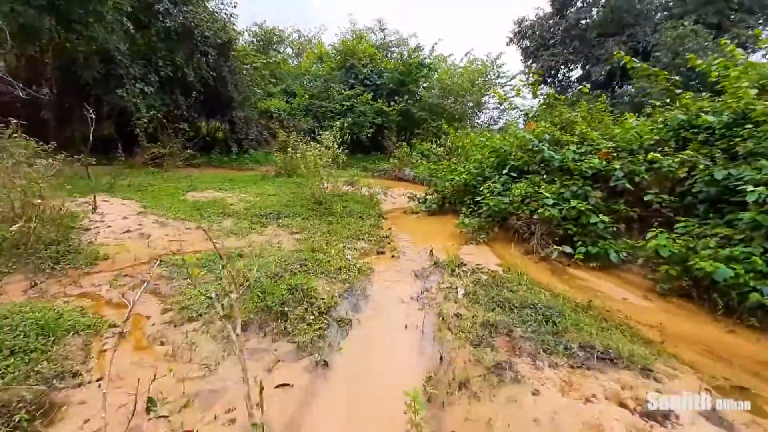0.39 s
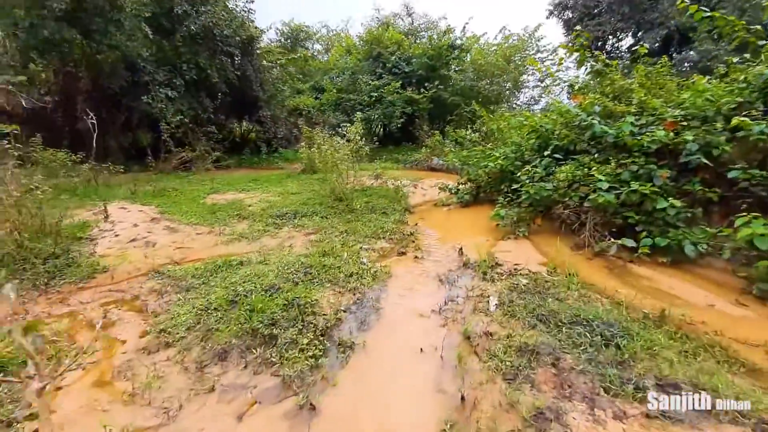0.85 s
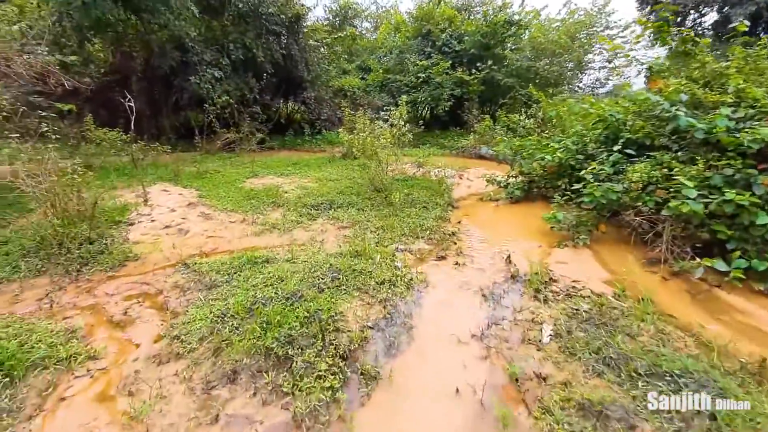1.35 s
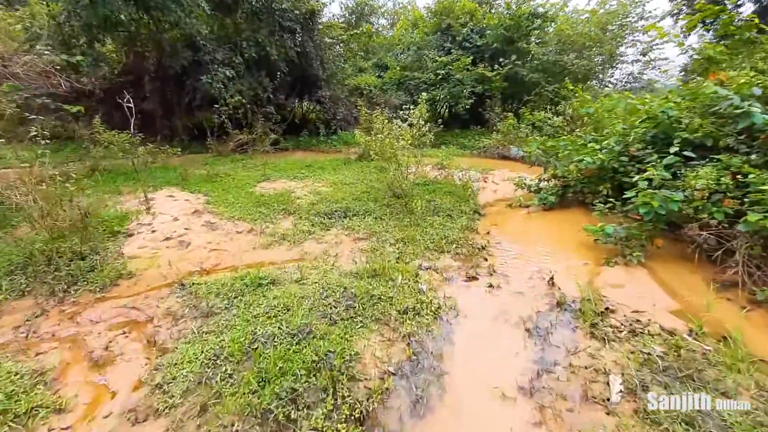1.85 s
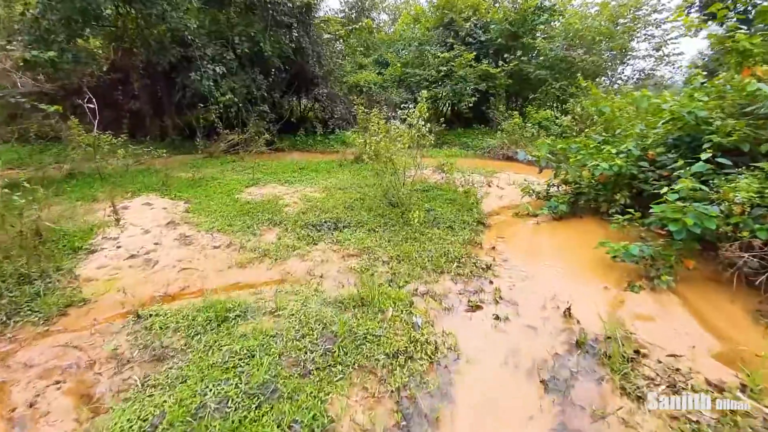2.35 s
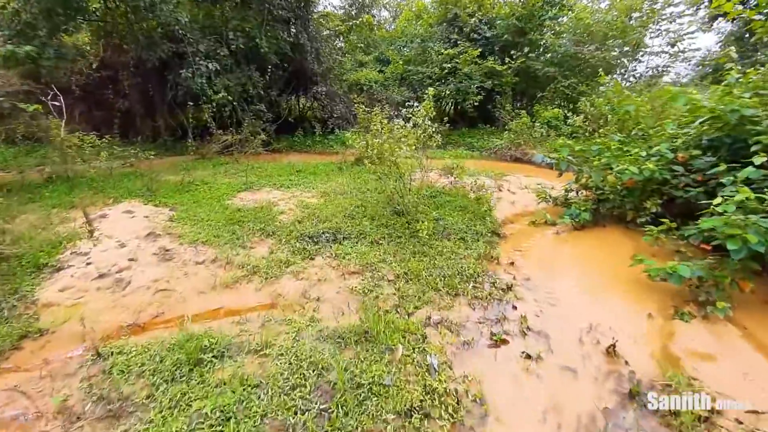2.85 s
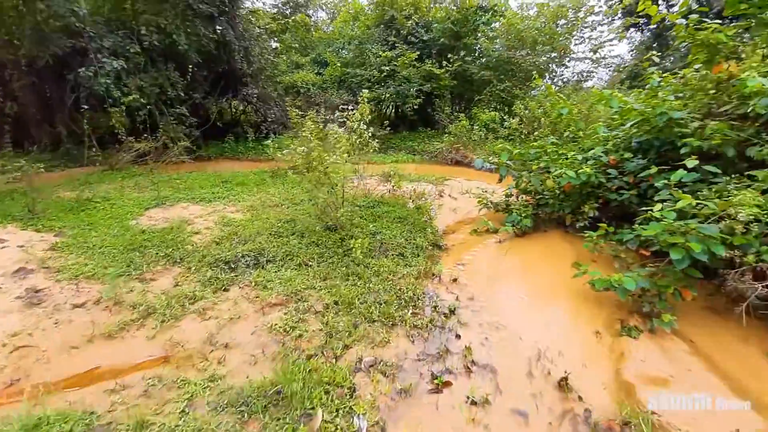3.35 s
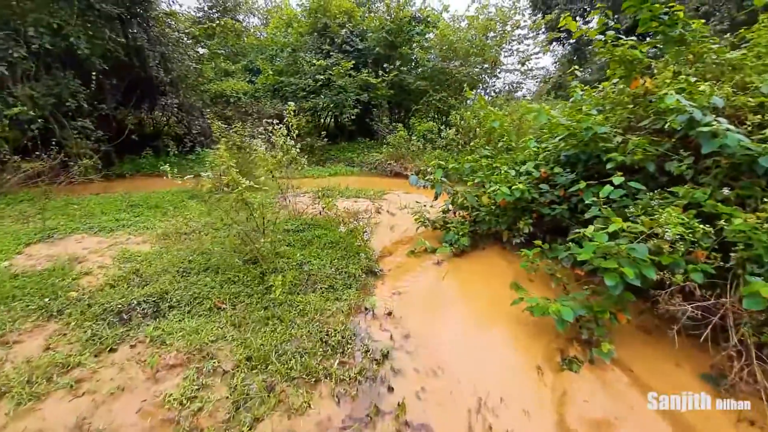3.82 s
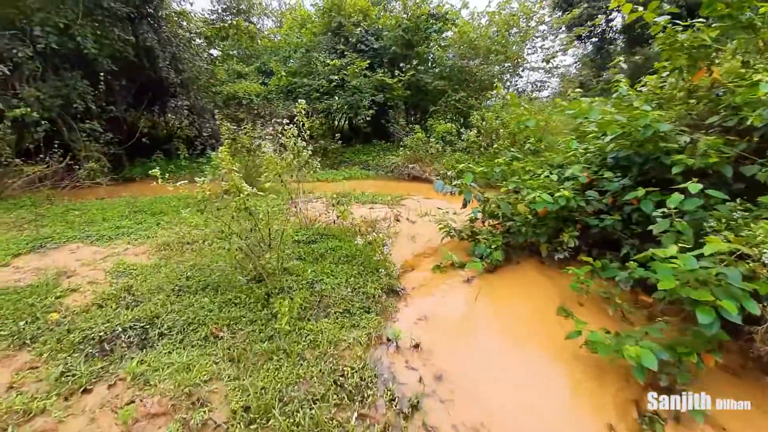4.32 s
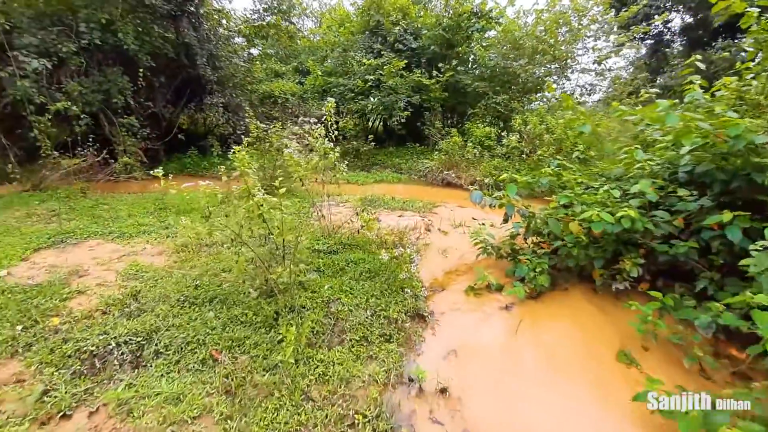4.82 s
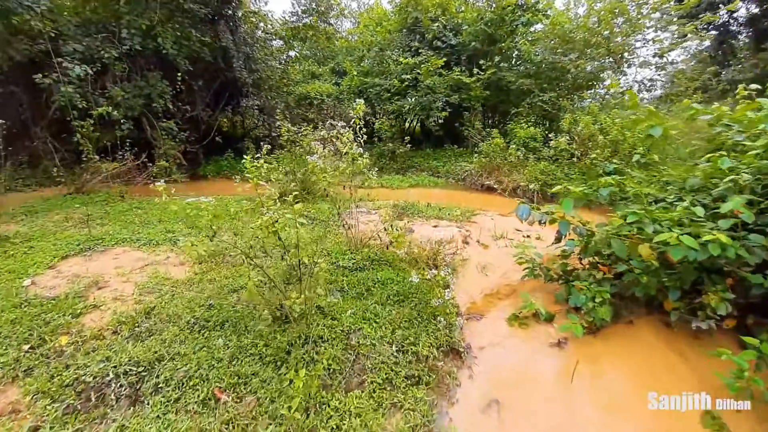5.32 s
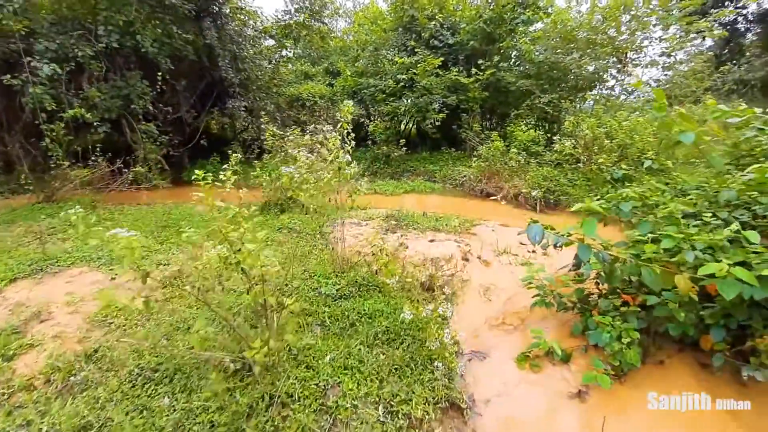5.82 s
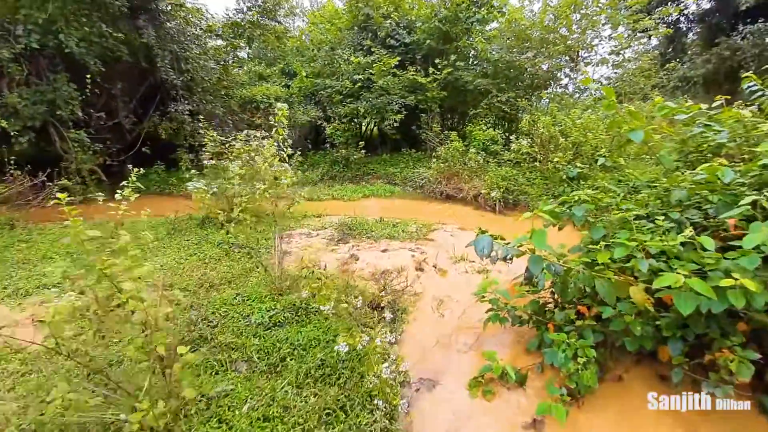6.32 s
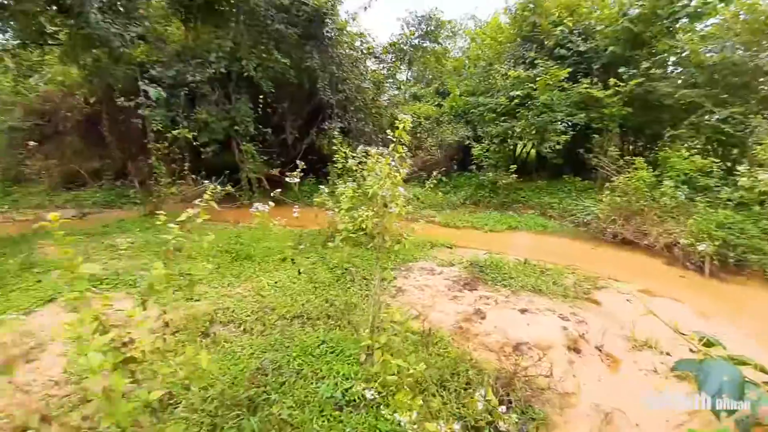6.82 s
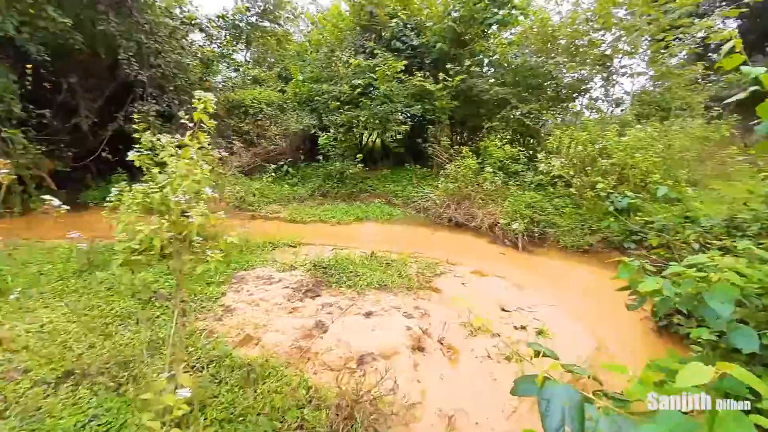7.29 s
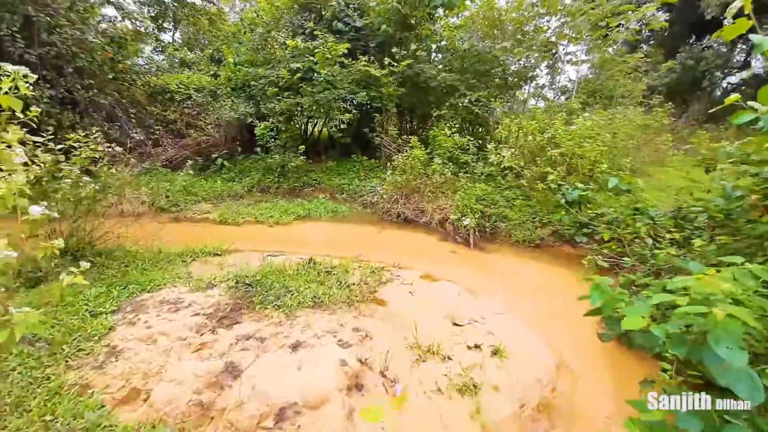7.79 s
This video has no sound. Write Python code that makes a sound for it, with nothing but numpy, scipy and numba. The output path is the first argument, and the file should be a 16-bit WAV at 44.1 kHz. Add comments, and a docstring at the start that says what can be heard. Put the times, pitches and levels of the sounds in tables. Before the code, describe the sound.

Someone wades through shallow muddy water outdoors, each stride sloshing, gurgling and plopping with bright fine spray, over faint low wind buffeting.

```python
"""Someone wades through shallow muddy water, carrying a two-port microphone: each stride sloshes, built from
patchy noise blended with swarms of ringing bubbles as gurgle, splash and fine spray. Larger trapped bubbles
plop as damped sines, many rising in pitch; droplets snap as clusters of short pings. Light wind buffets
the ports as low noise, different on each. The water drifts from side to side; the sound cuts out once, briefly."""
import sys
import numpy as np
from scipy import signal
from scipy.fft import rfft, irfft, next_fast_len
from scipy.io import wavfile
from scipy.ndimage import uniform_filter1d, map_coordinates
from numba import njit

SR = 44100
rng = np.random.default_rng(int(sys.argv[2]) if len(sys.argv) > 2 else 0)


def bounce(signal):
    """Save signal as a 16-bit WAV file at the path given by the first command-line argument."""
    frames = np.transpose(np.atleast_2d(signal))
    limited = np.clip(frames, -1, 1)
    pcm = np.round(limited * 32767).astype(np.int16)
    wavfile.write(sys.argv[1], SR, pcm)


def makeup_ratio(level_db):
    """Linear amplitude ratio for a level in decibels (20 dB per factor of ten)."""
    decades = np.asarray(level_db, float) / 20
    return 10 ** decades


N = 349272  # samples
LAG_S = .0001  # spread of arrival-time differences between the ports


def unit(x):
    """Scaled to rms 1."""
    return x / np.sqrt(np.mean(x ** 2) + 1e-20)


def along(points, hz):
    """(f/Hz, value) points read on a log frequency axis."""
    f, value = np.transpose(points)
    return np.interp(np.log(hz + 1), np.log(f + 1), value)


def wobble(rate):
    """A smooth random curve, rate knots a second."""
    return map_coordinates(rng.standard_normal(int(N * rate / SR) + 4), [np.arange(N) * rate / SR])


def filtered(x, response):
    """x shaped by a response of frequency."""
    m = next_fast_len(N + 8192)
    return irfft(rfft(x, m) * response(np.fft.rfftfreq(m, 1 / SR)), m)[..., :N]


def swells(crest_s, rise_ms, fall_ms):
    """Power of each swell (one row each, a point per ms) and the time since its crest in s."""
    since = np.arange(0, N / SR, .001) - np.reshape(crest_s, (-1, 1))
    pace_ms = np.where(since < 0, np.reshape(rise_ms, (-1, 1)), np.reshape(fall_ms, (-1, 1)))
    decades = 1000 * np.abs(since) / np.maximum(pace_ms, 5)  # no pace is quicker than 5 ms per 10 dB
    return 10 ** -np.minimum(decades, 12), since


def per_sample(slow):
    """A curve with a point per ms, stretched to one value per sample."""
    return np.interp(np.arange(N) / SR, np.arange(len(slow)) / 1000, slow)


def summed(shape, crest_db, calm_db):
    """Gain of all swells together over a calm level, added by power."""
    return per_sample(np.sqrt(makeup_ratio(crest_db) ** 2 @ shape + makeup_ratio(calm_db) ** 2))


def rush(spectrum, lag_s, patchy_db):
    """Patchy stereo noise; sources all around make the ports differ once the lag nears a period."""
    z = signal.stft(rng.standard_normal((2, N)), nperseg=256)[2]
    field = uniform_filter1d(rng.standard_normal(z.shape[1:]), 5, axis=0)
    field = uniform_filter1d(field, 5, axis=1)
    pair = signal.istft(z * makeup_ratio(patchy_db * unit(field)), nperseg=256)[1][:, :N]

    def mid_side(hz):
        alike = np.exp(-(2 * np.pi * hz * lag_s) ** 2 / 2)  # correlation between the ports
        turn = np.arccos(alike) / 2
        return makeup_ratio(along(spectrum, hz)) * [np.cos(turn), np.sin(turn)]

    mid, side = filtered(pair, mid_side)
    return unit(np.array([mid + side, mid - side]))


@njit
def ring(start, size, hz, t60, rise, lag, soft, count):
    """Damped sines whose pitch glides as the bubble nears the surface, one arrival time per port."""
    out = np.zeros((2, count))
    for k in range(len(start)):
        for port in range(2):
            s0 = start[k] + (port - .5) * lag[k]
            first = int(np.ceil(s0 * SR))
            for i in range(max(first, 0), min(first + int(t60[k] * SR * .75) + 1, count)):
                t = i / SR - s0
                swell = (1 - np.exp(-t * hz[k] / soft)) * np.exp(-np.log(1000) * t / t60[k])
                out[port, i] += size[k] * swell * np.sin(2 * np.pi * hz[k] * t * (1 + rise[k] * t / t60[k]))
    return out


def swarm(per_s, centre_hz, octaves, cycles, scatter_db, rise, soft):
    """Countless small bubbles: random times, pitches and sizes, rms 1."""
    count = int(np.ceil(per_s * N / SR))
    when, luck = rng.random((count, 2)), rng.standard_normal((count, 4))
    centre = np.broadcast_to(centre_hz, N)[(when[:, 0] * N).astype(int)]
    hz = np.clip(centre * 2 ** (octaves * luck[:, 0]), 100, SR / 2.6)
    size = makeup_ratio(np.minimum(-scatter_db * np.log(when[:, 1] + 1e-9), 4 * scatter_db))  # few large, many small
    t60 = cycles / hz * 2 ** (luck[:, 1] / 2)
    glide = rise * (1 + luck[:, 3])
    return unit(ring(when[:, 0] * N / SR, size, hz, t60, glide, LAG_S * luck[:, 2], soft, N))


def blend(noise, grains, share):
    """Two textures mixed by power, share being the part of the second."""
    return np.sqrt(1 - share) * noise + np.sqrt(share) * grains


# colour of the wind: f/Hz, relative level/dB
WIND_COLOUR = [(20, -43), (32, -20), (45, 6.5), (62, 4.5), (110, 4), (160, -3.5), (230, -37)]
# puffs of wind, before each port's own gain: crest t/s, level/dB, rise and fall [ms per 10 dB]
WIND_PUFFS = [(.48, -46.5, 63), (.8, -56, 90), (.92, -60, 62), (1.19, -55, 30), (3.41, -61, 35),
              (3.75, -59.5, 110), (4.24, -58.5, 68), (4.57, -61, 44), (5.05, -64, 90), (5.84, -53, 40),
              (6.36, -58.5, 136), (7.05, -63, 120), (7.7, -78, 150)]


def wind():
    """Low lumps of air on the ports, different on each."""
    s, db, pace_ms = np.transpose(WIND_PUFFS)
    puffs = summed(swells(s, pace_ms, pace_ms)[0], db, calm_db=-73.5)
    lumps = makeup_ratio(1.7 * np.array([wobble(9.3), wobble(6.3)]))
    port_gain = makeup_ratio(np.array([[5.5], [.4]]))  # left, right
    return port_gain * puffs * unit(lumps * rush(WIND_COLOUR, 1, patchy_db=4.0))


# droplet snaps, before the pings scatter: t/s, level/dB, f/Hz
DROPLET_SNAPS = [(0.6566, -17.5, 14500), (0.7615, -29.5, 7950), (.9354, -27, 11300), (2.9138, -18, 13400),
                 (2.944, -22.5, 12300), (3.305, -18.5, 4320), (3.3984, -24, 7400), (3.5795, -17, 4700),
                 (4.3084, -21, 5500), (5.0397, -30, 5960), (5.1877, -26.5, 7750), (5.2127, -28.5, 6600),
                 (5.4037, -24.5, 6540), (5.7762, -31.5, 5100), (6.3137, -25, 12500), (6.3466, -17, 12900),
                 (6.3791, -22, 11000), (6.4435, -25, 5400), (6.4704, -29, 12300), (7.7094, -21, 5400)]


def snaps():
    """A droplet strikes the surface and breaks up: six ragged pings scattered around one pitch."""
    s, db, hz = np.repeat(np.transpose(DROPLET_SNAPS), 6, axis=1)
    luck = rng.standard_normal((len(s), 2))
    lag = LAG_S * np.repeat(rng.standard_normal(len(DROPLET_SNAPS)), 6)
    late = luck[:, 0] ** 2  # later pings are weaker
    when = s + 0.0014 + 0.00063 * late
    pitch_hz = np.clip(hz * 2 ** (0.41 * luck[:, 1]), 100, SR / 2.8)
    return ring(when, makeup_ratio(db - late), pitch_hz, 0.0019 + 7 / hz, 0 * s, lag, 0.21, N)


# air pockets closed in by the foot: start t/s, level/dB, starting f/Hz, t60 [s],
# mean pitch rise over t60 [share of the starting pitch]
AIR_BUBBLES = [(.2466, -15, 1180, 0.013, 0.011), (.3494, -9, 260, 0.076, 0.024),
               (.3508, -16.5, 1210, 0.022, 0.12), (.3763, -20, 432, 0.097, 2), (.42, -23, 590, 0.062, 0.54),
               (.4845, -16.5, 903, .06, 0.19), (0.5114, -16, 870, .013, .5), (.5252, -20.5, 2030, 0.024, 0),
               (.599, -22.5, 2010, 0.019, 0.057), (.88, -27.8, 1060, 0.085, 0.63),
               (.9443, -24.5, 1930, 0.018, 0.14), (.985, -29, 1620, .034, .13), (1, -30.5, 1210, 0.048, .1),
               (1.027, -34, 306, 0.14, 0.18), (1.1797, -32, 1490, 0.04, 0), (1.396, -23.5, 1920, 0.017, 0),
               (1.6475, -23.5, 1410, 0.015, 0), (1.844, -45.5, 346, 0.12, .5),
               (1.879, -33.5, 1040, 0.063, 0.72), (2.0865, -26, 887, 0.068, 0.36),
               (2.1493, -23.5, 925, 0.087, 0.24), (2.2308, -17, 1060, 0.014, 0.072),
               (2.2932, -24, 910, 0.054, 0.29), (2.3094, -22.5, 2160, 0.014, 0.04),
               (2.6825, -29.5, 1170, .039, 0.18), (2.8594, -21, 1340, 0.015, 0.046),
               (3.0614, -25, 1290, 0.018, 0), (3.2118, -19.5, 1970, 0.0084, 0),
               (3.51, -30, 480, 0.059, 0.31), (3.598, -24, 1190, 0.013, 0), (3.618, -25, 1240, 0.038, 0),
               (3.6352, -12, 990, 0.0093, 0.11), (3.6568, -15, 399, .043, 0), (3.7, -27.5, 204, 0.14, 1.4),
               (3.707, -14, 2460, 0.0041, 0.036), (3.8, -31, 235, 0.088, .5),
               (4.1265, -19.5, 980, 0.042, 0), (4.1747, -17.5, 836, 0.062, 0.18),
               (4.2386, -23, 610, 0.035, 2.4), (4.245, -29.5, 290, .12, 0.37),
               (4.2741, -22.5, 583, .036, 1.8), (4.4958, -19, 1050, 0.018, 0),
               (4.5403, -21.5, 2130, .008, 0.19), (4.9822, -21, 638, 0.087, 0.21),
               (4.9927, -8, 626, 0.016, 0), (4.9932, -10.5, 1206, 0.032, 0), (5.0666, -9.5, 517, 0.011, 0),
               (4.7207, -23.5, 3640, 0.012, 0.52), (4.889, -32, 400, 0.067, 0.0086),
               (5.151, -23.5, 447, 0.058, 0), (5.2545, -25.5, 795, 0.037, 0.042),
               (5.276, -25.5, 844, .039, .12), (5.5755, -32, 442, 0.087, 0), (5.736, -30, 870, .028, 1.3),
               (5.7805, -21.5, 692, 0.055, 0.44), (6.222, -24, 2090, 0.033, 0.14),
               (6.2703, -24, 3390, .008, 0), (6.318, -29.5, 484, 0.066, 1),
               (6.3333, -22.5, 1270, .025, 0.16), (6.3502, -25, 950, 0.042, 0),
               (6.3744, -22.5, 1307, 0.034, .2), (6.4412, -26, 1150, 0.018, 0),
               (6.4433, -15, 3830, 0.0083, 0.4), (6.5332, -32.5, 560, .05, 1.4),
               (6.7751, -29, 1500, 0.0092, 2.1), (6.7833, -12.5, 2070, 0.0034, 0.12),
               (6.7878, -20, 1900, 0.0039, 0.35), (6.859, -30.5, 1990, 0.011, 0.038),
               (6.896, -32, 1060, 0.053, 0.73), (7.084, -27, 1070, 0.047, 0.35),
               (7.1522, -24.5, 890, 0.033, 1), (7.153, -21, 1960, 0.0096, 0.088),
               (7.1634, -12, 1030, 0.0072, 0), (7.175, -24, 1000, 0.014, .2),
               (7.2382, -32.5, 622, 0.067, .5), (7.3767, -29, 710, .092, 0.42),
               (7.5417, -23, 715, 0.034, 2.4), (7.5522, -20.5, 870, 0.021, 0),
               (7.7246, -15, 580, 0.0082, 0), (7.7547, -24.5, 700, .029, 1.6), (7.8009, -28, 600, .05, 0.7),
               (7.854, -33, 645, 0.069, 0.57)]


def bubbles():
    """Pockets of air closed in by the foot: damped plops, many with a pitch that climbs."""
    s, db, hz, t60, rise = np.transpose(AIR_BUBBLES)
    lag = .6 * LAG_S * rng.standard_normal(len(s))
    return ring(s, makeup_ratio(db), hz, t60, rise, lag, 0.32, N)


# colour of the spray noise: f/Hz, relative level/dB
SPRAY_COLOUR = [(1060, -23), (1800, -3), (3050, -5.5), (6600, -7), (8590, -12), (12100, -6), (13800, -8),
                (15850, -10.5), (16400, -45)]


def spray_texture():
    """Fine hiss full of tiny bubbles, with single drops falling back."""
    tiny = swarm(1100, 7620, 0.89, cycles=9.7, scatter_db=3.0, rise=0.091, soft=0.26)
    drops = swarm(160, 3097, 0.541, cycles=24.7, scatter_db=3.0, rise=0.306, soft=0.18)
    hiss = blend(rush(SPRAY_COLOUR, LAG_S, patchy_db=1.5), tiny, 0.32)
    return blend(hiss, drops, 0.19)


# colour of the splash noise: f/Hz, relative level/dB
SPLASH_COLOUR = [(520, -47), (850, -1), (1150, -5), (2000, -7.5), (3500, -11), (6000, -29)]


def splash_texture():
    """Broken water: mid-pitched bubbles ringing over patchy noise."""
    ringing = swarm(260, 1329.6, .45, cycles=34.3, scatter_db=1.0, rise=0.403, soft=0.2)
    return blend(rush(SPLASH_COLOUR, LAG_S, patchy_db=4.0), ringing, 0.75)


# a foot sinks in and drags air under: crest t/s, rise [ms per 10 dB], fall [ms per 10 dB],
# gurgle level/dB before the surges, air pocket f/Hz before the ceiling below
FOOT_PLUNGES = [(0.246, 14, 169, -40.5, 569), (0.35, 16, 88, -34, 304), (0.773, 9, 147, -51.5, 495),
                (1.013, 43, 105, -40.5, 490), (1.648, 106, 108, -47, 520), (2.14, 30, 146, -47, 576),
                (2.315, 7, 97, -34, 556), (2.487, 91, 27, -43, 536), (3.039, 208, 25, -46, 540),
                (3.154, 107, 201, -42.5, 492), (3.526, 54, 4, -57, 527), (3.645, 20, 57, -36.5, 430),
                (3.788, 79, 297, -35.5, 282.5), (4.235, 12, 107, -35.5, 557), (4.704, 71, 49, -50.5, 543),
                (4.993, 59, 136, -30, 579), (5.263, 144, 30, -36.5, 600), (5.402, 37, 22, -44, 632),
                (5.576, 38, 86, -46.5, 461), (5.78, 71, 138, -37, 511), (6.3, 99, 36, -45.5, 310),
                (6.527, 4, 42, -44, 606), (7.023, 76, 121, -37, 356), (7.521, 119, 89, -41.5, 600),
                (7.715, 25, 189, -42.5, 505)]
CLIMB_OCT_PER_S, SMALLEST_POCKET_HZ = 2.85, 600  # pockets shrink after the crest, down to the smallest


def pockets():
    """Gurgle gain and pocket pitch: the loudest plunge leads, its pitch climbing after the crest."""
    s, rise_ms, fall_ms, db, hz = np.transpose(FOOT_PLUNGES)
    shape, since = swells(s, rise_ms, fall_ms)
    climbing = hz[:, None] * 2 ** (CLIMB_OCT_PER_S * np.clip(since, 0, 2))
    climbing = np.minimum(climbing, SMALLEST_POCKET_HZ)
    power = shape * makeup_ratio(db)[:, None] ** 2
    pocket_hz = per_sample((power * climbing).sum(axis=0) / power.sum(axis=0))
    return summed(shape, db, calm_db=-77.5), pocket_hz


# colour of the gurgle noise around large pockets: f/Hz, relative level/dB
GURGLE_COLOUR = [(130, -12), (200, -3.5), (280, -1), (400, -6), (650, -45)]


def gurgle_texture(pocket_hz):
    """Low churn and bubbles that follow the pocket pitch."""
    shallow = np.clip(np.log2(pocket_hz / 290), 0, 1)  # small pockets churn an octave above large ones
    large = rush(GURGLE_COLOUR, LAG_S, patchy_db=5.5)
    small = rush(np.multiply(GURGLE_COLOUR, [2, 1]), LAG_S, patchy_db=3.0)
    glugs = swarm(120, pocket_hz, 0.256, cycles=16.9, scatter_db=2.2, rise=0.342, soft=0.068)
    return blend(blend(large, small, shallow), glugs, 0.54)


# each push of a leg through the surface, levels before the surges: crest t/s, rise [ms per 10 dB],
# fall [ms per 10 dB], splash level/dB, spray level/dB
LEG_SLOSHES = [(0.189, 20, 164, -57, -41), (0.244, 15, 78, -35, -38.5), (0.423, 52, 130, -31.5, -37.5),
               (0.527, 82, 15, -30.5, -33.5), (0.771, 86, 50, -56, -41), (0.871, 77, 55, -45.5, -43.5),
               (0.982, 74, 232, -44.5, -47.5), (1.163, 32, 163, -42, -50), (1.397, 52, 31, -45, -38),
               (1.496, 42, 118, -50.5, -42.5), (1.653, 41, 152, -47.5, -46.5), (1.73, 70, 81, -63, -39.5),
               (1.953, 51.5, 134, -43.5, -39), (2.131, 45, 182, -38, -39), (2.305, 25, 314, -38.5, -36),
               (2.47, 123, 47, -42, -37), (2.725, 129, 255, -42, -36.5), (2.921, 27, 319, -36, -37),
               (3.314, 61, 19, -37, -38), (3.425, 102, 134, -39.5, -37), (3.613, 126, 34, -37.5, -36.5),
               (3.733, 73, 80, -33.5, -41), (3.863, 46, 292, -35.5, -39.5), (4.19, 165, 223, -32.5, -35.5),
               (4.522, 20, 115, -44, -41.5), (4.72, 100, 62, -42, -39.5), (4.985, 111, 178, -29, -33.5),
               (5.256, 49, 97.5, -32, -41.5), (5.406, 72, 38, -49, -41), (5.522, 44, 295, -46, -41.5),
               (5.73, 14, 311, -38.5, -80), (5.966, 74, 243, -42, -44.5), (6.173, 122.5, 185, -44.5, -41),
               (6.337, 33, 106, -35.5, -34.5), (6.445, 34, 10, -54, -27), (6.539, 106, 17, -43, -41.5),
               (6.787, 153, 21, -41, -44), (7.034, 79, 83, -37, -35.5), (7.569, 270, 46, -41, -45),
               (7.732, 133, 165, -37, -34)]


def wading():
    """Gurgle, splash and spray pushed up by the legs; the same small surges shake all three."""
    gurgle_gain, pocket_hz = pockets()
    s, rise_ms, fall_ms, splash_db, spray_db = np.transpose(LEG_SLOSHES)
    shape = swells(s, rise_ms, fall_ms)[0]
    surge, splutter = np.tanh(wobble(30)), np.tanh(wobble(65))  # the flow limits how far a surge can swell
    gurgle = gurgle_gain * makeup_ratio(2.24 * surge) * gurgle_texture(pocket_hz)
    splash_gain = summed(shape, splash_db, calm_db=-78.5) * makeup_ratio(3.82 * surge + 1.5 * splutter)
    spray_flutter_db = 0.73 * wobble(16) + 0.31 * surge + 1.55 * splutter + 1.96 * wobble(120)
    spray_gain = summed(shape, spray_db, calm_db=-65.5) * makeup_ratio(spray_flutter_db)
    return gurgle + splash_gain * splash_texture() + spray_gain * spray_texture()


# balance of the water: t/s, left-right level/dB
WATER_BALANCE = [(0.0, -3.5), (0.88, -2.5), (0.97, 1.5), (1.34, -2.5), (5.8, -2.5), (6.4, -5.5),
                 (6.44, -6.5), (6.53, -5.5), (7.92, -2)]


def drift(water):
    """The water moves from side to side by level."""
    s, db = np.transpose(WATER_BALANCE)
    pan_db = np.interp(np.arange(N) / SR, s, db)
    return water * makeup_ratio([pan_db / 2, -pan_db / 2])


# left-right difference added by the ports: f/Hz, level/dB
PORT_TILT = [(300, 1), (1400, 2), (3000, 0), (10000, -1)]


def through_ports(water):
    """Each port has its own tilt, and both pass little airborne bass."""
    def response(hz):
        bass_cut = (1j * hz / (1j * hz + 170)) ** 3
        return makeup_ratio(np.outer([.5, -.5], along(PORT_TILT, hz))) * bass_cut
    return filtered(water, response)


def scene():
    """Water that drifts from side to side, in light wind."""
    water = wading() + bubbles() + snaps()
    return through_ports(drift(water)) + wind()


def band_limit(x):
    """A steep low-pass at the top of the band."""
    return signal.sosfilt(signal.butter(12, 17000, fs=SR, output="sos"), x)


CUT_FROM_S, CUT_TO_S, CUT_EDGE_S = 6.791, 6.8325, .0015  # silence between the two times, faded at its edges


def record(dry):
    """The sound drops out for a moment; the top is cut steeply above 16 kHz."""
    t = np.arange(N) / SR
    on = np.clip(np.maximum(CUT_FROM_S - t, t - CUT_TO_S) / CUT_EDGE_S, 0, 1)
    mix = filtered(dry * on, lambda hz: 1 / (1 + (hz / 16050) ** 120))
    return band_limit(mix)


dry = scene()
out = record(dry)
bounce(out)
```